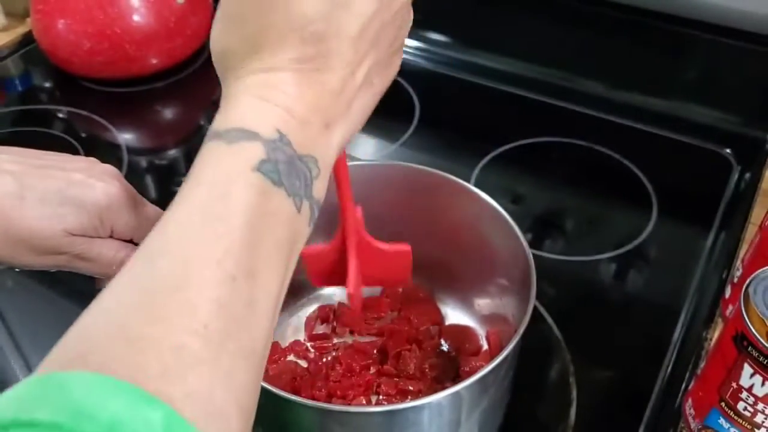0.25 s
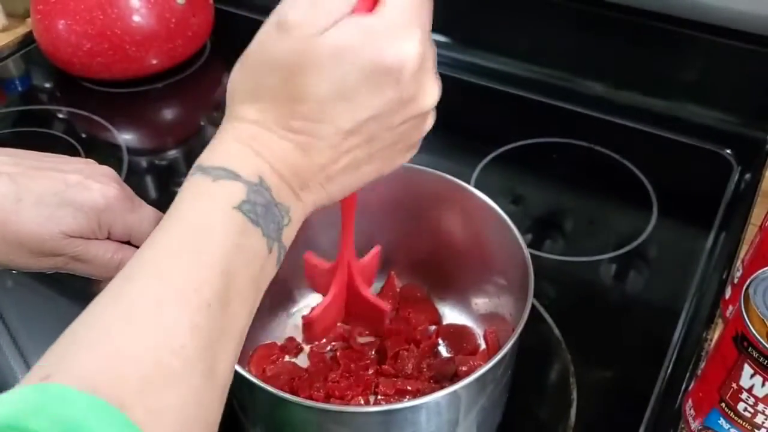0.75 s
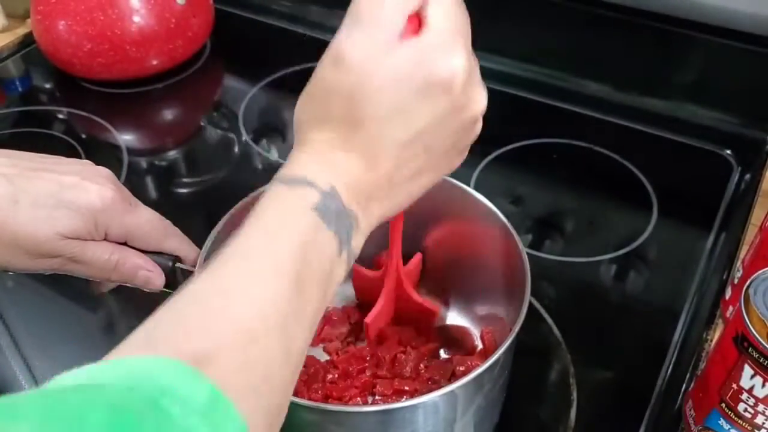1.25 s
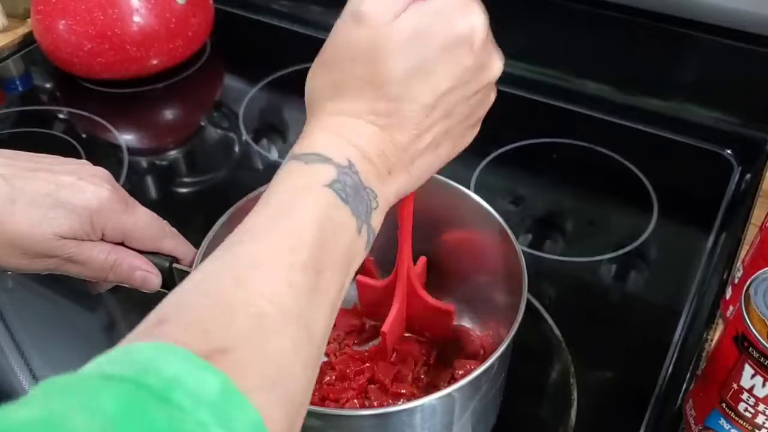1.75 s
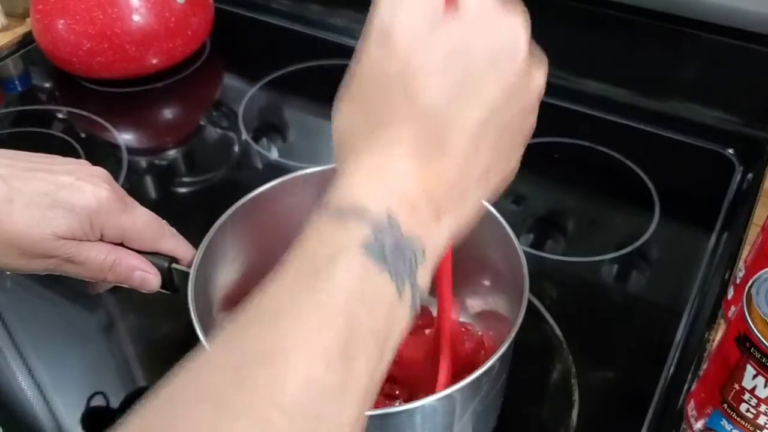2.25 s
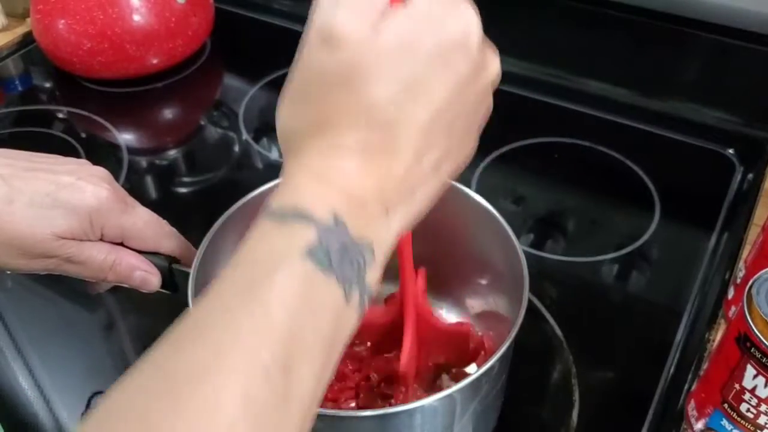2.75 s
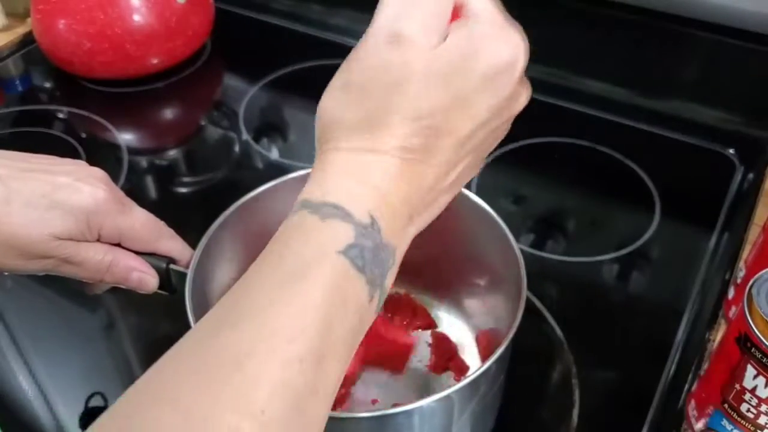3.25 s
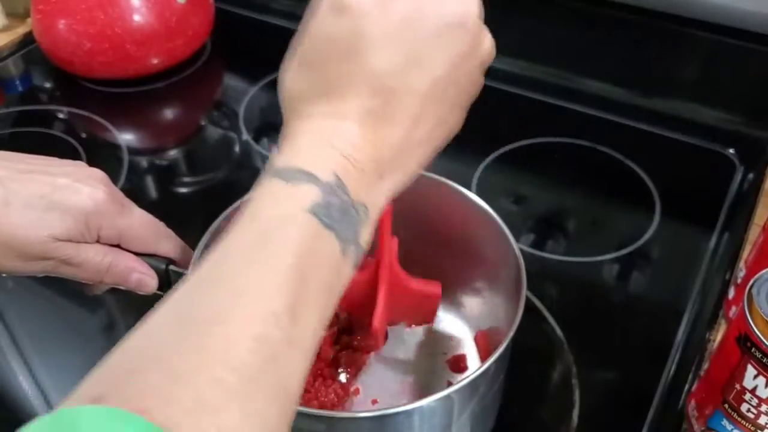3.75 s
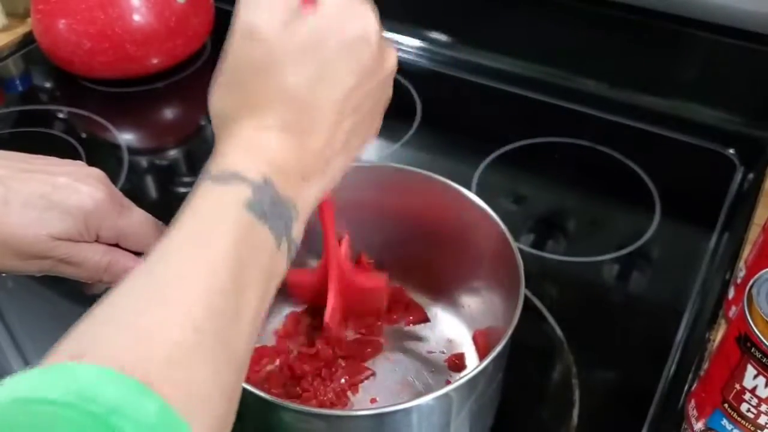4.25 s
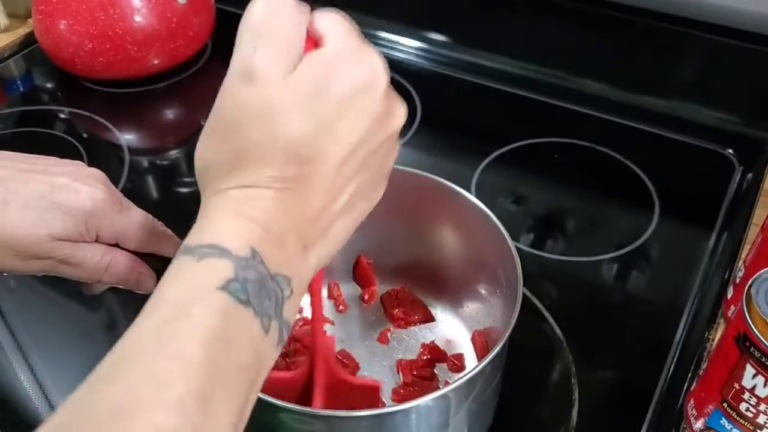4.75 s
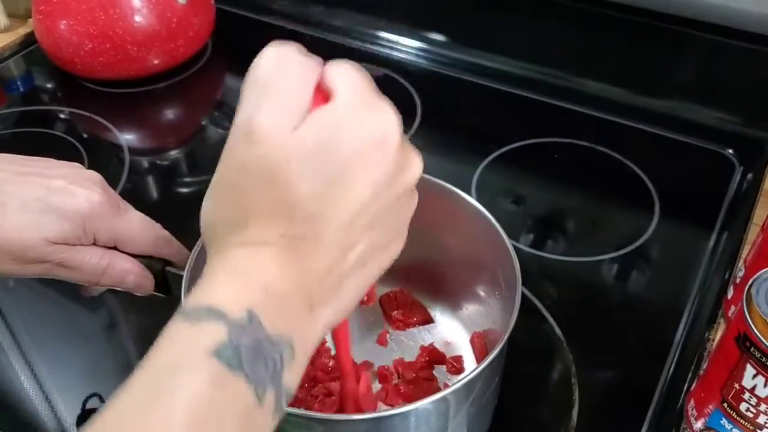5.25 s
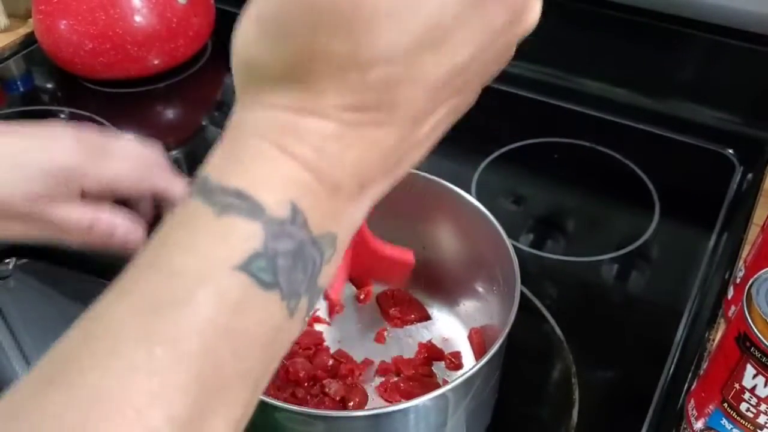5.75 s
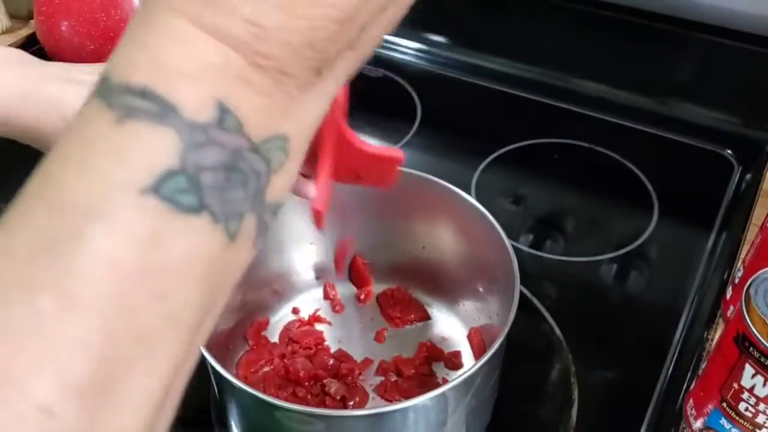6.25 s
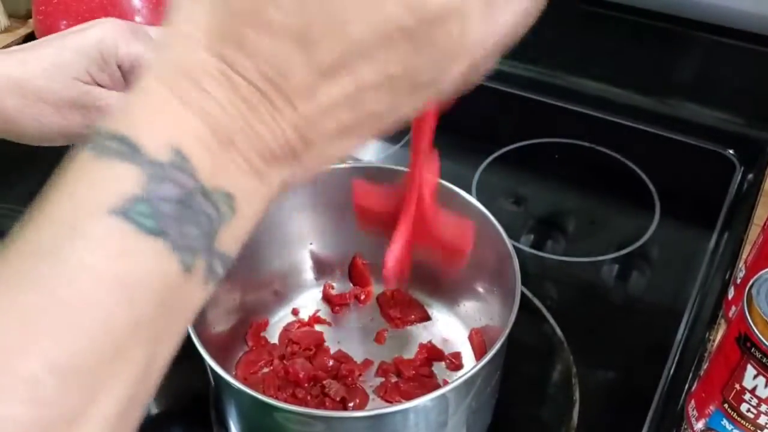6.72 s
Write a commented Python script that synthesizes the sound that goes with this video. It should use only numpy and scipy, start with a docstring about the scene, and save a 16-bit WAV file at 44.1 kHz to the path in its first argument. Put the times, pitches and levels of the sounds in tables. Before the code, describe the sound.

A hard plastic chopper strikes a steel pot base at close range in a kitchen. A blow lands right at 0 s with a soft scrape, then others at about 0.5, 0.9, 1.25, 1.6, 2.0, 2.3, 2.6 and 2.9 s: sharp cracks with short, dull metallic thuds, damped by soft food. Brighter clanks off the wall come just before some blows, notably at 0.46, 2.2, 3.34 and 5.22 s. After a small gap with faint touches and wet ticks near 3.1 s, blows resume at 3.46, 3.9, 4.3, 4.7, 5.0 and 5.26 s, some with a brief mushy slide. The loudest falls at 5.5 s. A faint tap follows at 5.7 s, then tiny wet ticks and a very soft rustle from 6.65 s. Low appliance hum and airy room tone run throughout, with stove rumble swelling under the blows and dying slowly. Stereo, short dull room tail.

```python
"""A plastic chopper is driven again and again onto the base of a steel pot on a glass hob, heard close in a kitchen.
Blows on the damped base and clips on the freer wall sum decaying modes, dense dying noise and short cracks.
The blades slide through soft food as swelling noise, wet food ticks in noise bursts, and soft rubbing comes in spells.
Behind them lie filtered air noise, appliance hum and a dull noise-made tail; a stereo microphone pair hears it all."""
import sys
import numpy as np
from scipy import signal
from scipy.io import wavfile

SR = 44100
rng = np.random.default_rng(int(sys.argv[2]) if len(sys.argv) > 2 else 0)


def persist_wave(psi):
    """Save psi, clipped to +-1, as 16-bit WAV."""
    counts = np.round(np.clip(psi, -1, 1) * 32767).astype(np.int16)
    wavfile.write(sys.argv[1], SR, np.atleast_2d(counts).T)


N = 308126


def amp(db):
    """Decibels to gain."""
    return 10 ** (np.asarray(db) / 20)


def rms_one(x):
    """Scale to rms 1."""
    return x / np.sqrt(np.mean(x ** 2) + 1e-20)


def at_hz(points, hz):
    """Read a curve of (Hz, value) rows on a log-frequency axis."""
    points = np.array(points)
    return np.interp(np.log(hz), np.log(points[:, 0]), points[:, 1])


def filtered(x, order, hz, kind):
    """Butterworth filter with its corner or corners in Hz."""
    return signal.sosfilt(signal.butter(order, hz, kind, fs=SR, output="sos"), x)


def clicks(times, sizes):
    """A train of single samples."""
    out = np.full(N, 1e-18)
    out[(np.asarray(times) * SR).astype(int)] = sizes
    return out


def dying(train, t60):
    """Every click starts an exponential decay that falls 60 dB in t60 seconds."""
    return signal.lfilter([1], [1, -amp(-60 / (t60 * SR))], train)


def flutter_gain(rate_hz, depth_db):
    """Uneven gain: slow noise, read in decibels, makes a level flutter."""
    r = np.exp(-2 * np.pi * rate_hz / SR)
    wander = rms_one(signal.lfilter([1], [1, -2 * r, r * r], rng.standard_normal(N)))
    return amp(depth_db * wander)


BANDS = 25 * 2 ** np.arange(0, 9.6, 1 / 3)   # third-octave edges in Hz


def stereo_bands(likeness):
    """Third-octave bands of white stereo noise with a set left-right likeness, each with its centre in Hz."""
    white = rng.standard_normal((2, 2, N))
    for k, (low, high) in enumerate(zip(BANDS, BANDS[1:])):
        centre = np.sqrt(low * high)
        mid, side = filtered(white[k % 2], 2, [low, high], "band")
        alike = np.clip(at_hz(likeness, centre), -1, 1)
        yield centre, np.sqrt(1 + alike) * mid + np.sqrt(1 - alike) * side * [[1], [-1]]


# Air of the kitchen. Each row: pitch in Hz, relative density in dB.
AIR = [(15, -60), (25, -39), (43, -9.5), (80, -14.5), (118, 2), (150, -7.5), (182, -12), (470, -17),
       (538, -17.5), (766, -23.5), (1220, -29.5), (2460, -32.5), (7920, -50), (15200, -48), (16500, -58)]
# How alike the two microphones hear the air. Each row: pitch in Hz, left-right likeness from -1 to 1.
AIR_LIKENESS = [(60, 1), (130, 0.95), (290, 0.88), (640, 0.17), (1410, -0.31), (3100, 0.046),
                (6820, -0.092), (15000, -0.1)]
# Appliance motors. Each row: pitch in Hz, width in Hz, rms level in dB.
HUM = [(61, 9.1, -50), (107, 17, -58), (120.6, 4.4, -52), (753, 17, -66)]
ROOM_TONE_DB = -42
# hob and cabinet rumble on after each thump, below the top pitch
SHAKE_DB, SHAKE_T60_S, SHAKE_TOP_HZ = -13.5, 1.9, 907


def hob_shake():
    """Each hob thump raises the rumble, which builds up and then dies slowly."""
    rows = np.array([row[:3] for row in BLOWS])
    thumps = clicks(rows[:, 0], amp(rows[:, 1] + rows[:, 2]))
    slow = dying(dying(thumps, SHAKE_T60_S), 0.092)   # the second decay rounds the onset
    return amp(SHAKE_DB) * slow * np.log(1000) / (.15 * SR)


def motor_hum():
    """Noise through narrow resonances wavers like the hum of motors, the same at both microphones."""
    hum = 0
    for hz, width, db in HUM:
        r = np.exp(-np.pi * width / SR)
        resonance = [1, -2 * r * np.cos(2 * np.pi * hz / SR), r * r]
        hum = hum + amp(db) * rms_one(signal.lfilter([1, 0, -1], resonance, rng.standard_normal(N)))
    return hum


def room_tone():
    """Broad air noise whose low part swells after each blow, over the hum of motors."""
    shake = hob_shake()
    low, high = 0, 0
    for hz, noise in stereo_bands(AIR_LIKENESS):
        band = amp(at_hz(AIR, hz)) * noise
        if hz < SHAKE_TOP_HZ:
            low = low + band
        else:
            high = high + band
    scale = 1 / np.sqrt(np.mean((low + high) ** 2))
    air = np.hypot(amp(ROOM_TONE_DB), shake) * low + amp(ROOM_TONE_DB + 2.5) * high
    return scale * air + motor_hum()


# Blows on the pot base. Each row: start in seconds, level in dB, then hob thump, base ring, treble
# and slide, all in dB relative to that level.
BLOWS = [(0.0004, -8, -20, -5, -12, -48), (0.512, -8, -24, -12.5, -17, -54),
         (0.9298, -11, -16.5, -6, -15.5, -36), (1.2508, -8, -15, -9.5, -16.5, -26.5),
         (1.6228, -3.5, -18, -7.5, -13, -46), (1.9769, -5.5, -17.5, -7.5, -10, -27.5),
         (2.2945, -7.5, -14, -7, -10.5, -22.5), (2.583, -7.5, -19, -9.5, -15.5, -40),
         (2.8935, -9.5, -14, -3.5, -11.5, -21), (3.05, -31, -3, -8.5, -24, -23),
         (3.4585, -7, -14, -9, -10, -29.5), (3.586, -24, -32, -17, -21, -34),
         (3.915, -5, -21.5, -14, -12, -44), (4.2735, -8.5, -23, -8, -16, -24),
         (4.6852, -6, -21, -7, -12.5, -32), (4.9732, -3, -21.5, -10.5, -15.5, -38.5),
         (5.263, -9.5, -13.5, -5, -15, -16.5), (5.5003, -1, -20.5, -16, -17, -51),
         (5.7158, -38.5, 0, 1.5, -18, -27)]
SLIDE_S = 0.021   # the blades rub through the food this long before they land


def slides():
    """The blades rub through the food with rising force just before they land; gives the gain for noise."""
    t, out = np.arange(N) / SR, np.zeros(N)
    for s, db, *_, slide_db in BLOWS:
        force = np.interp(t, [s - SLIDE_S, s], [.1, 1], left=0, right=0)
        out += amp(db + slide_db) * force
    return out


# the struck spot lifts the modes near its favoured pitch and sets their ring-time factor
FAVOUR_DB, FAVOUR_OCTAVES, FAVOUR_RING = 3.5, 0.044, 1.24


def favour(hz, spot_hz):
    """Closeness 0-1 of a mode to the pitch that the struck spot favours."""
    return np.exp(-(np.log2(hz / spot_hz) / FAVOUR_OCTAVES) ** 2)


# Clips on the pot wall. Each row: start in seconds, level in dB, lowest mode in dB relative to that level,
# favoured pitch in Hz, ring-time factor of the other modes.
CLIPS = [(.4578, -8.5, -14, 5480, 0.88), (0.9023, -27.5, -2, 1260, .8), (2.1939, -12, -5.5, 5577, 0.68),
         (2.8669, -12.5, -27, 8900, 1.5), (3.3412, -4.5, -3.5, 5040, 1.03),
         (4.138, -16.5, -9.5, 3095, 0.53), (5.2212, -7.5, -10.5, 4715, 0.7), (5.723, -34.5, -8, 3750, .5)]
# Colour shared by all clips. Each row: pitch in Hz, relative level in dB.
CLIP_COLOUR = [(1300, -15.5), (3300, -11), (4900, -8), (5500, -11.5), (7500, -5)]
MID_DB = -10.5   # 1.5-3.5 kHz body of every blow, relative to its level


def blow_colour(hz):
    """Level in dB of every blow (rows) at a frequency, for base blows and wall clips."""
    blows, clips = [], []
    for s, db, thump_db, ring_db, treble_db, slide_db in BLOWS:
        colour = [(220, thump_db), (450, ring_db), (800, ring_db),
                  (1500, MID_DB), (3500, MID_DB), (7000, treble_db)]
        blows.append(db + at_hz(colour, hz))
    for s, db, low_db, spot_hz, ring in CLIPS:
        lift_db = FAVOUR_DB * favour(hz, spot_hz) - 2.5 * (hz < 450)   # the wall hardly shakes the hob
        clips.append(db + at_hz([(550, low_db)] + CLIP_COLOUR, hz) + lift_db)
    return np.array(blows), np.array(clips)


# How alike the two microphones hear a hit. Each row: pitch in Hz, left-right likeness.
HIT_LIKENESS = [(60, .98), (125, .96), (250, .95), (500, .8), (1000, .6), (2000, .16), (8000, .02)]
# Tilt between the microphones. Each row: pitch in Hz, left minus right in dB.
BALANCE_DB = [(60, -3), (130, 1), (290, -1), (640, 2.5), (1410, 0), (3100, -1.5), (6820, -2), (15000, 1.5)]


def strike(out, s, modes, level_db, ring, spread_db, held_s, held_t60):
    """One blow rings every mode with a beating level, each microphone at its own phase; damped from held_s on."""
    hz, db, t60 = np.array(modes).T[:, :, None]
    i = int(s * SR)
    t = np.arange(min(SR // 4, N - i)) / SR
    draw = rng.standard_normal((4, len(hz), 1))
    db = db + level_db[:, None] + spread_db * draw[0]
    db = db - 60 * t / (t60 * np.maximum(ring, .2))
    db = db - 60 * np.clip(t - held_s, 0, None) / held_t60
    beat = 1 + 0.44 * np.sin(2 * np.pi * 0.011 * hz * draw[2] * t + draw[3])
    swell = np.minimum(t * hz / 0.32, 1) * beat   # lows build up slowly
    turn = np.arccos(at_hz(HIT_LIKENESS, hz)) * np.sign(draw[1]) / 2
    for c, side in enumerate([1, -1]):
        gain = amp(db + side * at_hz(BALANCE_DB, hz) / 2)
        wave = gain * swell * np.sin(2 * np.pi * hz * t + side * turn)
        out[c, i:i + len(t)] -= wave.sum(axis=0)


# Modes of the base and the hob under it. Each row: pitch in Hz, relative level in dB,
# 60 dB decay in seconds before the food shortens it.
BASE = [(63.4, -2, 0.29), (107, -2, 0.09), (179.7, 0.5, 0.14), (328, -11.5, 0.092), (510.2, -4.5, 0.14),
        (548, -11.5, 0.064), (650, -8.5, 0.032), (737, -8, 0.098), (959.4, -11.5, 0.15), (1237, -5.5, 0.09),
        (1463, -22, 0.022), (1616, -18.5, 0.015), (1728, -7, 0.057), (1887, -12, 0.0984),
        (2302, -5.5, 0.079), (2600, -5, 0.058), (2981, -5, 0.049), (3017, -10.5, 0.049),
        (3265, -10.5, 0.077), (3790, -35.5, 0.13), (4730, 0, 0.013), (5580, -6, 0.076), (6670, -6.5, 0.068),
        (8800, -4.5, 0.078), (9340, -7, 0.089)]
# Modes of the freer wall. Each row: pitch in Hz, relative level in dB,
WALL = [(540, -5, 0.19), (804, -15.5, 0.22), (1040, -25, 0.16), (1123, -13.5, 0.079), (1242, -7.5, 0.0957),
        (1700, -31, 0.38), (1880, -22, 0.16), (2370, -29, 0.29), (3130, -17, 0.4), (3230, -21, .25),
        (3570, -19, 0.11), (3750, -16.5, 0.225), (4410, -18, 0.067), (4740, -9, 0.069), (5040, -18.5, 0.17),
        (5510, -15.5, 0.082), (5590, -17.5, 0.19), (6160, -13.5, 0.1), (6840, -21.5, 0.23),
        (8200, -36, 0.066), (8420, -31, 0.079), (9250, -27.5, 0.065), (9609, -26.5, 0.083)]
UPPER_MODES_DB, BASE_RING = -3.5, .85   # food dulls the base modes above 900 Hz and shortens them all


def pot_modes():
    """The pressed base rings briefly; the wall rings freer until the next blow damps it, favoured modes least."""
    out = np.zeros((2, N))
    blow_s = np.array([b[0] for b in BLOWS] + [np.inf])
    base_hz, wall_hz = np.array(BASE)[:, 0], np.array(WALL)[:, 0]
    dulling_db = UPPER_MODES_DB * (base_hz > 900)
    for blow, db in zip(BLOWS, blow_colour(base_hz)[0]):
        strike(out, blow[0], BASE, db + 1.0 + dulling_db, BASE_RING,
               spread_db=3.5, held_s=np.inf, held_t60=1)
    for (s, _, _, spot_hz, ring), db in zip(CLIPS, blow_colour(wall_hz)[1]):
        free = favour(wall_hz, spot_hz)[:, None]
        next_blow_s = blow_s[blow_s > s][0]
        strike(out, s, WALL, db + 5.0, ring + (FAVOUR_RING - ring) * free,
               spread_db=4.5, held_s=next_blow_s - s, held_t60=.2 + 0.86 * free)
    return out


# Dense modes of the pot. Each row: pitch in Hz, relative density in dB.
CRASH = [(50, -17), (100, -3.5), (180, -19.5), (290, -12.5), (400, -27.5), (550, -7), (1270, -17.5),
         (1900, -18), (2800, -18.5), (5430, -21), (6180, -27), (9270, -20), (10800, -29), (15100, -25),
         (16500, -34)]
# Decay of those dense modes. Each row: pitch in Hz, 60 dB decay in seconds.
CRASH_T60 = [(150, 0.12), (600, 0.047), (2500, 0.092), (7000, 0.04), (15000, 0.081)]
# Decay of the room's tail. Each row: pitch in Hz, 60 dB decay in seconds.
ROOM_T60 = [(150, 0.27), (600, 0.38), (2500, 0.38), (7000, 0.26), (15000, 0.28)]
CLATTER_DB, CLATTER_T60_S = -10.5, 0.2   # the free wall's dense upper modes outlast those of the base


def crash():
    """Modes too dense to tell apart: noise dying band by band, then the slower tail of the room."""
    out, slide = 0, slides()
    flutter = [flutter_gain(rate_hz=90, depth_db=2.5) for _ in range(3)]   # uneven, grainy dying of the noise
    times = [row[0] for row in BLOWS + CLIPS]
    for hz, noise in stereo_bands(HIT_LIKENESS):
        blows, clips = blow_colour(hz)
        train = clicks(times, amp(np.r_[blows, clips - 5.5]))
        shape = dying(train, at_hz(CRASH_T60, hz)) + amp(-14.5) * dying(train, at_hz(ROOM_T60, hz))
        shape += amp(-2.0) * dying(train, 0.017) * (hz > 900)   # the hard first contact
        if hz > 300:   # lows build up slowly
            speed = min(hz / 1500, 1)
            shape = signal.lfilter([speed], [1, speed - 1], shape)
        else:
            shape = dying(shape, 0.045) * 7 / (0.036 * SR)
        if 900 < hz < 8000:
            wall_hits = clicks(times[len(BLOWS):], amp(clips - 6.5))
            shape += amp(CLATTER_DB) * dying(wall_hits, CLATTER_T60_S)
        shape += slide * (hz / 2000) ** 0.29
        gain = amp(at_hz(CRASH, hz) + at_hz(BALANCE_DB, hz) * np.array([[.5], [-.5]]))
        out = out + gain * shape * noise * flutter[int(hz) % len(flutter)]
    return amp(19.0) * out


# Spells of soft rubbing: scrapes close to blows, and quiet rustle.
# Each row: start in seconds, length in seconds, level in dB.
RUBBING = [(0.001, .08, -32.5), (2.996, 0.18, -54.5), (4.211, .07, -36), (5.67, .13, -56),
           (6.103, .14, -61.5), (6.658, .7, -58)]
RUBBING_RISE_S, RUBBING_LOW_HZ = 0.042, 2000
RUBBING_FALL_LENGTHS = 2.8   # the fade to -60 dB takes this many spell lengths


def rubbing():
    """Soft bright rubbing noise, different at each microphone; a spell rises, and fades from half its length on."""
    t, level = np.arange(N) / SR, 0
    for s, length, db in RUBBING:
        fade_db = -60 * np.clip(t - s - length / 2, 0, None) / (RUBBING_FALL_LENGTHS * length)
        level = level + amp(db + fade_db) * np.clip((t - s) / RUBBING_RISE_S, 0, 1)
    noise = rms_one(filtered(rng.standard_normal((2, N)), 1, RUBBING_LOW_HZ, "high"))
    return level * flutter_gain(rate_hz=21, depth_db=2.0) * noise


# the blade meets bare steel just after the thud starts; clips crack more softly
CRACK_DELAY_S, CRACK_DB, CLIP_CRACK_DB = 0.001006, 7, -12.5


def cracks():
    """The first touch of hard plastic on steel: one short inward pulse."""
    touches = [row[:2] for row in BLOWS] + [(s, db + CLIP_CRACK_DB) for s, db, *_ in CLIPS]
    rows = np.array(touches)
    train = clicks(rows[:, 0] + CRACK_DELAY_S, amp(rows[:, 1] + CRACK_DB))
    return -filtered(train, 2, [1000, 5500], "band")


def kitchen(x):
    """Pot cavity, hob, cupboards and walls return a dense dull tail, another one at each microphone."""
    t = np.arange(SR // 3) / SR
    shared, own = rng.standard_normal(len(t)), rng.standard_normal((2, len(t)))
    echoes = own + filtered(shared - own, 1, 900, "low")   # long waves reach both microphones alike
    echoes = filtered(echoes, 1, [250, 5000], "band")
    echoes = echoes * amp(-60 * t / 0.24) * np.minimum(t / 0.0038, 1)
    unit_echoes = echoes / np.sqrt(np.sum(echoes ** 2) / 2)
    return signal.fftconvolve(x, unit_echoes, axes=1)[:, :N]


# Wet ticks of the food. Each row: start in seconds, relative level in dB, centre pitch in Hz.
TICKS = [(0.656, -45, 9500), (1.1513, -49, 10400), (1.1694, -49, 5670), (1.2044, -38, 5310),
         (3.1223, -56, 14300), (3.148, -42, 5070), (5.7486, -32.5, 15600), (5.78, -45, 9000),
         (5.997, -57, 4190), (6.098, -47, 5670), (6.892, -45, 13100)]


def wet_ticks():
    """Wet food ticks: small, fast-dying bursts of broad noise around a centre pitch."""
    out, t = np.zeros((2, N)), np.arange(SR // 20) / SR
    for s, db, hz in TICKS:
        edges = [hz / 1.4, min(hz * 1.4, 16000)]
        burst = rms_one(filtered(rng.standard_normal((2, len(t))), 2, edges, "band"))
        i = int(s * SR)
        out[:, i:i + len(t)] += amp(db - 5.5 - 60 * t / 0.028) * burst
    return out


def scene():
    """Pot, food and room."""
    pot = pot_modes() + cracks()
    return pot + amp(-15.0) * kitchen(pot) + crash() + wet_ticks() + rubbing() + room_tone()


CUTOFF_HZ = 17000


def record(dry):
    """The microphone loses the deepest bass, peaks are rounded, the top is cut."""
    x = filtered(dry, 2, 44, "high")
    rounded = 1.2 * np.tanh(x / 1.2)
    x = signal.sosfilt(signal.cheby2(8, 20, 16300, fs=SR, output="sos"), rounded)
    return signal.sosfilt(signal.cheby2(12, 60, CUTOFF_HZ, fs=SR, output="sos"), x)


dry = scene()
out = record(dry)
persist_wave(out)
```